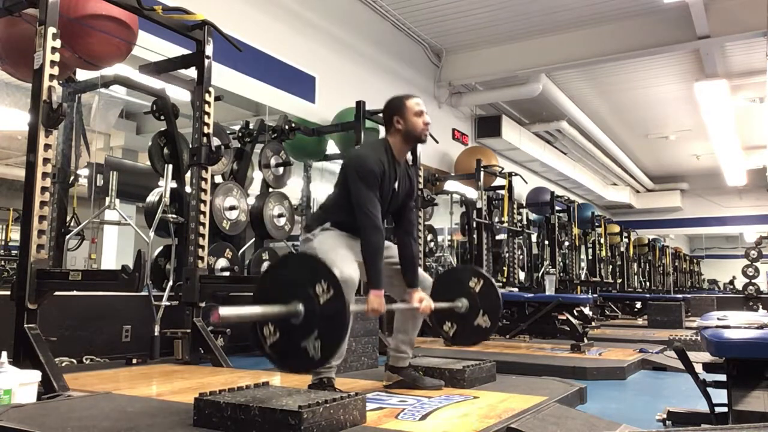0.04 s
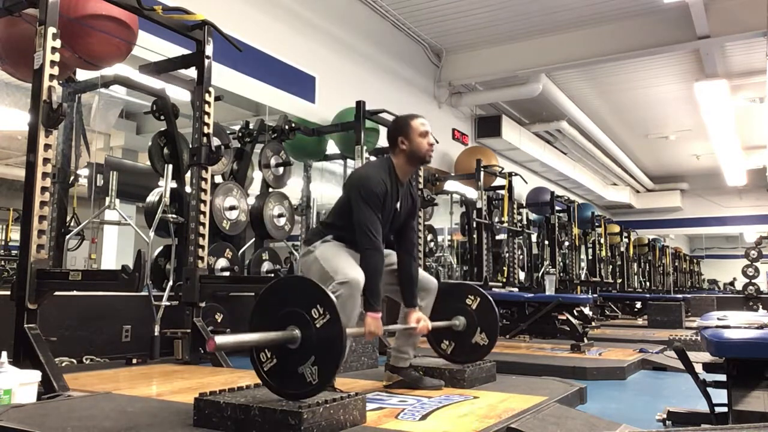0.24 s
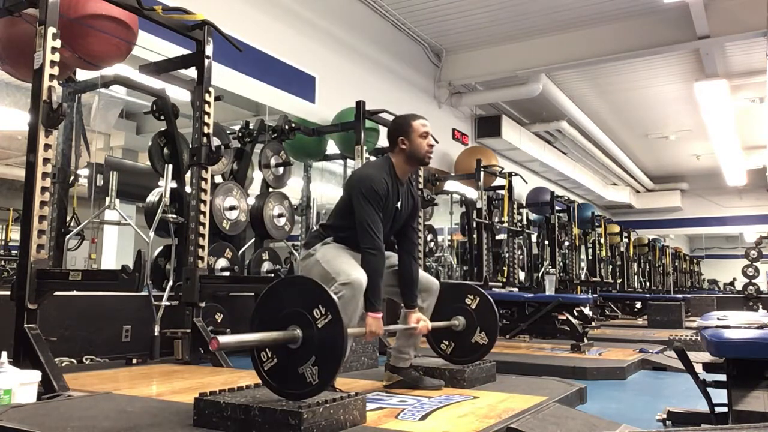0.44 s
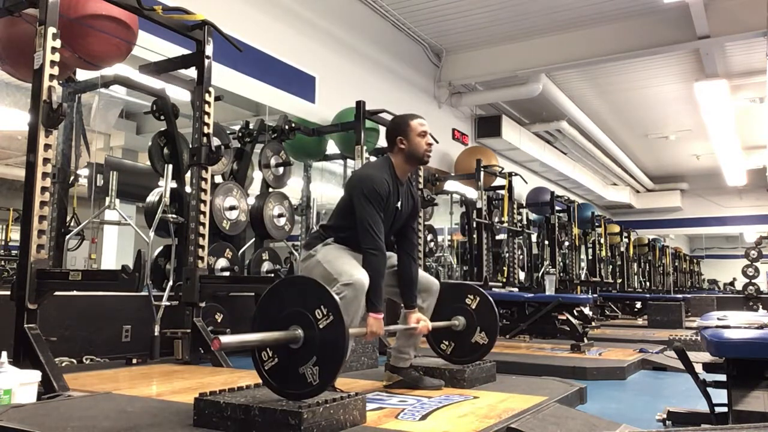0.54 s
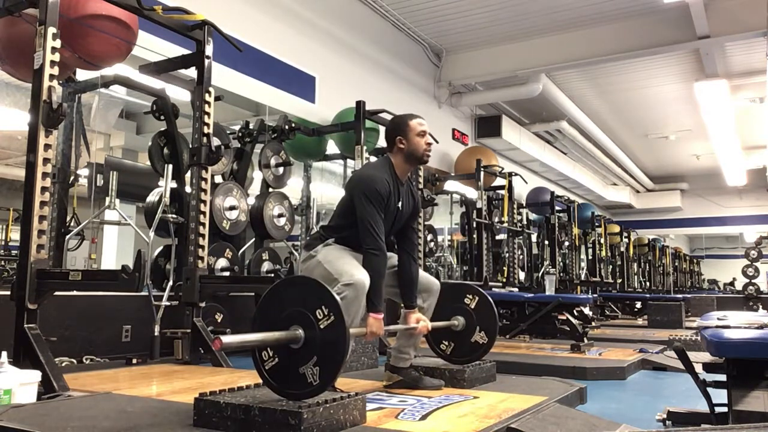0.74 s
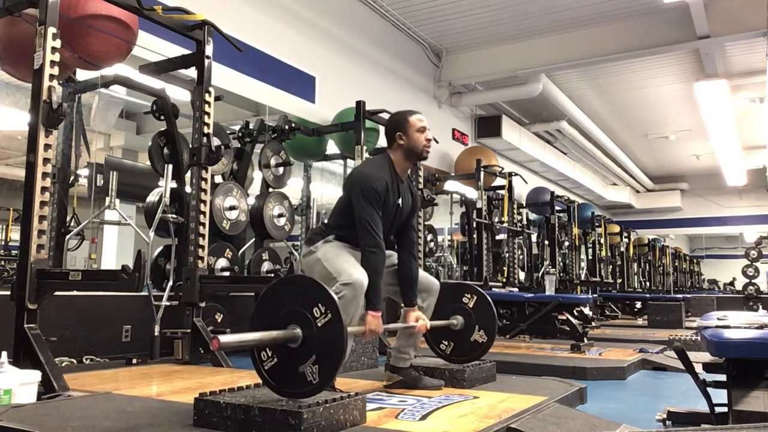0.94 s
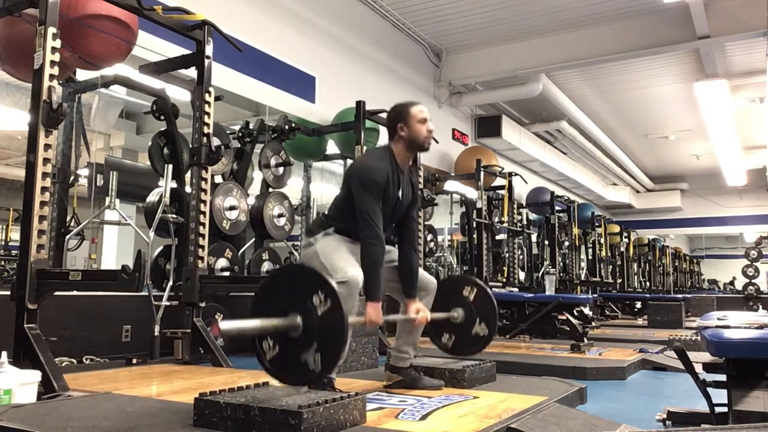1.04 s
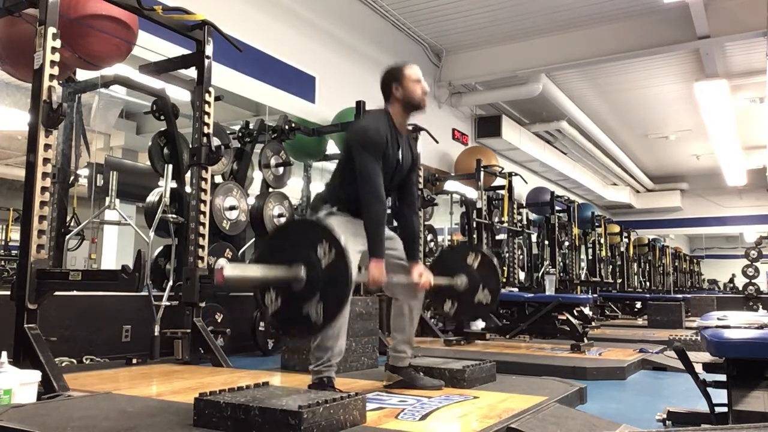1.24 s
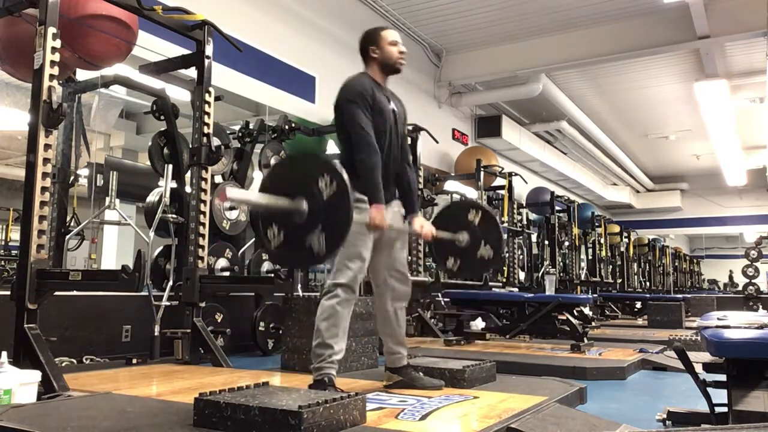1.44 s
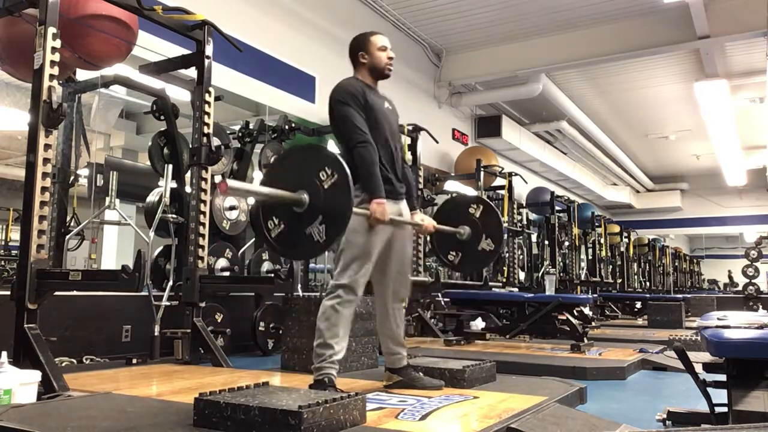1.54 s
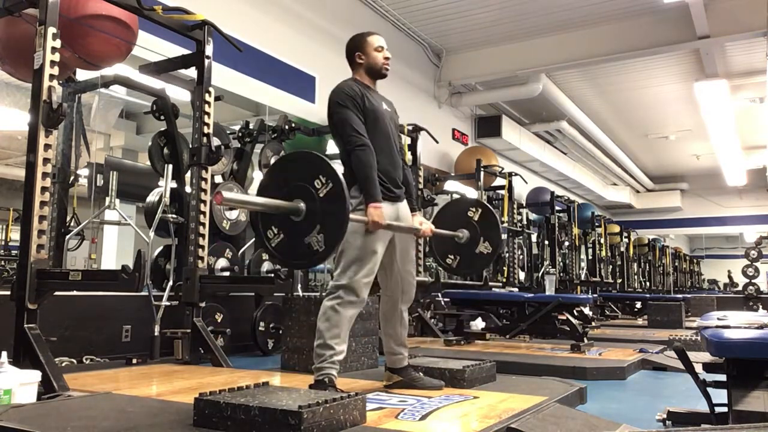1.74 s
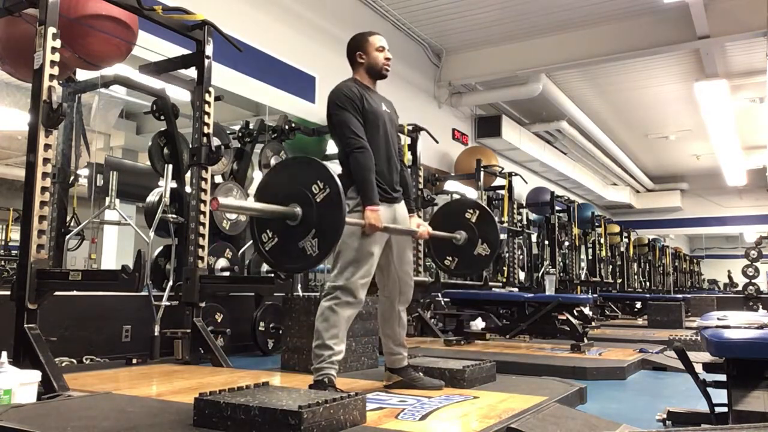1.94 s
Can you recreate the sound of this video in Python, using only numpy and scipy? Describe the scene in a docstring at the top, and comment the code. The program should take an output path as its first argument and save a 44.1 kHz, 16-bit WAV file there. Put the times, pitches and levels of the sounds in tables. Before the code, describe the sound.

In a big, reverberant gym, a barbell is set down with a heavy clang and metallic ringing. Quieter knocks follow as the bar is pulled up, then a few light rattles, over a low ventilation rumble.

```python
"""A large gym: a loaded barbell is set down on rubber blocks. The plates thud, clash on the
steel sleeves and slap together; the bar rings and flexes, and a collar jingles.
The plates knock as the bar is pulled taut, and the sleeves clink at the top of the next lift.
Blows are decaying noise, rings are modes and mode clusters. Ventilation rumbles under it all."""
import sys
import numpy as np
from scipy import signal
from scipy.fft import irfft
from scipy.io import wavfile

SR = 44100
rng = np.random.default_rng(int(sys.argv[2]) if len(sys.argv) > 2 else 0)


def file_out(sig):
    """Save sig as 16-bit WAV at sys.argv[1]."""
    # one column per channel
    cols = np.atleast_2d(sig).T
    # limit, then scale
    lim = np.clip(cols, -1, 1)
    pcm = np.round(lim * 32767).astype(np.int16)
    wavfile.write(sys.argv[1], SR, pcm)


N = 88200
T = np.arange(N) / SR

# Table levels are relative.
# plates landing on the blocks (time [s], level [dB])
THUD_HITS = [(0.2195, -3.5), (.230, -0.5), (0.251, 0), (0.267, -2.5), (.311, -1.5), (0.334, -0.5),
             (0.384, -4)]
# plates clashing on the bar (time [s], clash [dB], sleeve ring [dB])
CLASH_HITS = [(0.2255, 2, -7), (.233, 1.5, -14), (.239, 1, 1), (.249, 1.5, -7), (.2605, -3, -1),
              (.274, -2, -1.5), (0.282, -8.5, -9), (.289, -6, -5.5), (0.312, -12.5, 1),
              (0.3241, 0.5, -19.5), (0.3294, -5.5, -10), (.350, -20, -10), (0.4, -9, -21)]
# plate faces slapping (time [s], level [dB])
CLACK_HITS = [(.2405, -0.5), (0.25, -1.5), (0.2603, -3), (.325, 2), (0.3275, -2.5), (0.9199, -34),
              (1.501, -43)]
# bar bent on landing and lift-off (time [s], level [dB])
FLEX_HITS = [(.231, -1), (.905, -12)]
# plates shifting in the lift (time [s], knock [dB], sleeve ring [dB], tick [dB])
RATTLE_HITS = [(0.9063, -5, -35, 7.5), (.920, -3.5, -32, 8), (.928, -6.5, -38, -21), (.969, -9.5, -44, -22),
               (1.477, -22, -18.5, -7), (1.483, -8, -29, 1), (1.501, -3.5, -19.5, -2),
               (1.53, -26, -24, -5.5), (1.582, -8, -27, -8.5), (1.594, -10.5, -26.5, -6),
               (1.617, -15.5, -40, -20), (1.656, -11.5, -50.5, -13), (1.72, -13.5, -51, -24),
               (1.744, -21, -40, -27)]

# ringing modes of the loaded bar (frequency [Hz], level [dB])
RING_MODES = [(1281, -12), (1565, -10), (3023, -1), (3106, -6), (3588, -9), (3928, -4), (4005, -4),
              (4328, -2), (4407, -6), (4497, -4), (4730, -7), (5184, -10), (5416, 1), (6116, -8),
              (6576, -5), (6636, -9), (7584, -11), (8035, -3), (8644, -12), (10079, -11), (10854, -12),
              (13117, -14), (13353, -12), (13521, -9), (15349, -19)]
# bending modes of the bar (frequency [Hz], level [dB], t60 [s])
FLEX_MODES = [(96, -25, 1.4), (137, -29, 1.3), (176, -28, 1.4), (214, -30, 1.1), (295, -35, 1.5),
              (436, -38, 1.4), (483, -35, 1.3), (1180, -42, 1.9)]
# sleeve modes (frequency [Hz], width [Hz], landing [dB], light touch [dB], free t60 [s])
SLEEVE_CLUSTERS = [(3075, 96, 3, -8.5, 0.78), (5450, 110, 3.5, -3, 0.34), (8060, 100, 0.5, -7.5, 0.44),
                   (10050, 100, -5, -5, 0.42), (10590, 205, -18, -14, 0.55), (13400, 450, -11.5, -26, .55)]
# collar and plate hub modes (frequency [Hz], width [Hz], level [dB], t60 [s])
COLLAR_CLUSTERS = [(13530, 75, -41, .3), (15350, 90, -56, .4), (14400, 600, -55, .35)]
HUB_CLUSTERS = [(1515, 88, -63, 0.59), (2050, 114, -43.5, 0.83), (2900, 700, -38.5, 0.15),
                (8020, 87, -61, 0.31), (13000, 260, -62, .32)]

# spectra of the blows and the vent air (frequency [Hz], density [dB])
THUD_SPECTRUM = [(25, -65.5), (55, -36), (78, -13.5), (100, -2), (170, 0), (260, -9), (480, -12),
                 (800, -32.5), (1500, -29), (4000, -51.5)]
CLASH_SPECTRUM = [(200, -17), (700, 1.5), (1400, -7), (2100, 2), (2900, 0.5), (3550, -3), (4300, -2),
                  (5300, -6), (6000, -10), (8000, -11), (9200, -15), (10500, -9.5), (11800, -23.5),
                  (13500, -13.5), (15700, -20.5)]
CLACK_SPECTRUM = [(1500, -30), (3000, -30.5), (4000, 14.5), (5600, -1), (6600, -4.5), (8500, -19.5),
                  (11000, -30.5), (16000, -45)]
KNOCK_SPECTRUM = [(150, 0), (500, 4), (900, 1), (1500, 1.5), (2200, -0.5), (3100, -1.5), (4200, -19),
                  (6000, -22), (15000, -43)]
TICK_SPECTRUM = [(1000, 1), (4000, 13), (6500, 0), (9500, 1.5), (11700, -23), (12900, -4), (14000, -12),
                 (16000, -14)]
AIR_SPECTRUM = [(12, -69.5), (20, -54), (52, -6.5), (107, -3), (141, -9.5), (177, -6.5), (209, -13.5),
                (355, -15.5), (397, -22), (587, -22.5), (798, -29.5), (1210, -34), (1400, -42),
                (1850, -37.5), (4510, -52.5), (12000, -61), (15800, -67.5)]
# fan tones (frequency [Hz], width [Hz], level [dB])
FAN_TONES = [(101.8, 12, -42.5), (606, 18, -53), (1230, 10, -64)]
# hall decay (frequency [Hz], t60 [s])
HALL_DECAY = [(80, 1.8), (250, 2.44), (600, 1.7), (1200, 1.92), (2400, 1.344), (4000, 0.91), (7000, 0.68),
              (14000, 0.3)]

THUD_DB, CLASH_DB, CLACK_DB, BAR_DB, SLEEVE_DB = -13.5, -17.5, -12, -31, -30
KNOCK_DB, TICK_DB, AIR_DB = -31.5, -51.5, -35
SETTLE_S, PULL_S = 0.388, 0.918


def thuds():
    """Rubber plates hit the blocks and bounce."""
    out = np.zeros(N)
    for time_s, db in THUD_HITS:
        add(out, time_s, amp(THUD_DB + db) * burst(THUD_SPECTRUM, t60_s=0.13, attack_s=0.001))
    return out


def clashes():
    """Plate hubs slam against the sleeves and one another."""
    out = np.zeros(N)
    for time_s, db, _ in CLASH_HITS:
        add(out, time_s, amp(CLASH_DB + db) * burst(CLASH_SPECTRUM, t60_s=0.13, attack_s=0.00095))
    return out


def clacks():
    """Plate faces slap together, short and hard."""
    out = np.zeros(N)
    for time_s, db in CLACK_HITS:
        add(out, time_s, amp(CLACK_DB + db) * burst(CLACK_SPECTRUM, t60_s=0.028, attack_s=0.0005))
    return out


def bar_ring():
    """Each clash feeds the bar's modes; close neighbours make them beat."""
    out = np.zeros(N)
    strikes = [(time_s, db) for time_s, db, _ in CLASH_HITS]
    for hz, db in RING_MODES:
        envelope = build_up(strikes, t60_s=0.56 * (4000 / hz) ** 0.33)  # higher modes die sooner
        beating = mode(hz) + amp(-1) * cluster(hz, width_hz=30)
        out += amp(db) * envelope / envelope.max() * beating
    return amp(BAR_DB) * out


def bar_flex():
    """The bar bends and swings under its load."""
    out = np.zeros(N)
    for time_s, flex_db in FLEX_HITS:
        swing = sum(amp(db) * mode(hz, t60_s) for hz, db, t60_s in FLEX_MODES)
        add(out, time_s, amp(flex_db) * rise(attack_s=0.003) * swing)
    return out


def sleeves():
    """Clashes ring the sleeves; rattles make them clink."""
    out = np.zeros(N)
    landings = [(time_s, db) for time_s, _, db in CLASH_HITS]
    touches = [(time_s, db) for time_s, _, db, _ in RATTLE_HITS]
    for hz, width_hz, landing_db, touch_db, t60_s in SLEEVE_CLUSTERS:
        ring = amp(landing_db) * build_up(landings, t60_s)
        clink = amp(touch_db) * build_up(touches, 0.75 * t60_s)  # damped by a resting plate
        out += cluster(hz, width_hz) * (ring + clink)
    return amp(SLEEVE_DB) * out


def fittings():
    """A collar jingles as the load settles; the hubs ring as the bar is pulled taut."""
    out = np.zeros(N)
    for time_s, clusters in (SETTLE_S, COLLAR_CLUSTERS), (PULL_S, HUB_CLUSTERS):
        for hz, width_hz, db, t60_s in clusters:
            add(out, time_s, amp(db) * cluster(hz, width_hz, t60_s))
    return out


def rattles():
    """Loose plates knock and tick during the lift."""
    out = np.zeros(N)
    for time_s, knock_db, _, tick_db in RATTLE_HITS:
        knock = amp(KNOCK_DB + knock_db) * burst(KNOCK_SPECTRUM, t60_s=0.088, attack_s=0.00093)
        tick = amp(TICK_DB + tick_db) * burst(TICK_SPECTRUM, t60_s=0.056, attack_s=0.00032)
        add(out, time_s, knock + tick)
    return out


def hall(x, wet_db):
    """Direct sound plus dense reflections, each band dying at its own rate."""
    hz, time_s, bands = signal.stft(rng.standard_normal(N), SR, nperseg=256)
    decay_per_s = np.log(1000) / read(HALL_DECAY, hz)[:, None]
    unit_energy = np.sqrt(2 * decay_per_s / SR)
    tail = signal.istft(bands * np.exp(-decay_per_s * time_s) * unit_energy, SR, nperseg=256)[1][:N]
    onset = np.minimum(T / 0.012, 1)
    return x + amp(wet_db) * signal.fftconvolve(x, tail * onset)[:N]


def ventilation():
    """Steady air rumble with faint fan tones."""
    air = amp(AIR_DB) * noise(AIR_SPECTRUM)
    return air + sum(amp(db) * cluster(hz, width_hz) for hz, width_hz, db in FAN_TONES)


def burst(spectrum, t60_s, attack_s):
    """Many heavily damped modes struck at once."""
    return noise(spectrum) * fade(t60_s) * rise(attack_s)


def mode(hz, t60_s=np.inf):
    """One partial, random phase; sustained by default."""
    onset = np.minimum(T / 0.0005, 1)
    return np.sqrt(2) * np.sin(2 * np.pi * (hz * T + rng.random())) * fade(t60_s) * onset


def cluster(hz, width_hz, t60_s=np.inf):
    """Close modes beating around one frequency; sustained by default."""
    offset_hz = np.fft.rfftfreq(N, 1 / SR) - hz
    peak = (1 + (2 * offset_hz / width_hz) ** 2) ** -0.75
    return random_phase(peak) * fade(t60_s)


def build_up(strikes, t60_s):
    """Envelope of a ring fed by strikes (time [s], level [dB]); energies add and decay."""
    power = np.zeros(N)
    strike_power = fade(t60_s) ** 2 * rise(attack_s=0.001)
    for time_s, db in strikes:
        add(power, time_s, amp(db) ** 2 * strike_power)
    return np.sqrt(power)


def noise(spectrum):
    """Steady noise from a spectrum table, rms 1."""
    return random_phase(amp(read(spectrum, np.fft.rfftfreq(N, 1 / SR))))


def random_phase(magnitudes):
    """Noise from FFT magnitudes, rms 1."""
    x = irfft(magnitudes * np.exp(2j * np.pi * rng.random(len(magnitudes))), N)
    return x / np.sqrt(np.mean(x ** 2) + 1e-20)


def rise(attack_s):
    """Exponential attack."""
    return 1 - np.exp(-T / attack_s)


def fade(t60_s):
    """Exponential decay."""
    return np.exp(-np.log(1000) * T / t60_s)


def amp(db):
    """Decibels to gain."""
    return 10 ** (np.asarray(db) / 20)


def read(table, hz):
    """Table lookup on a log-frequency axis."""
    table_hz, values = np.transpose(table)
    return np.interp(np.log(hz + 1), np.log(table_hz + 1), values)


def add(mix, time_s, sound):
    """Mixes a sound in at time_s."""
    part = mix[round(time_s * SR):][:len(sound)]
    part += sound[:len(part)]


def scene():
    """Barbell, hall and ventilation, mono."""
    steel = bar_ring() + bar_flex() + hall(sleeves() + fittings(), wet_db=-7.5)
    blows = hall(thuds(), wet_db=3) + hall(clashes(), wet_db=-0.5) + hall(clacks(), wet_db=-10)
    return (steel + blows + hall(rattles(), wet_db=-0.5) + ventilation())[None]


def record(dry):
    """Microphone low cut, soft overload on the highest peaks, band limit."""
    low_cut_hz, high_cut_hz, ceiling = 61, 15850, 0.95
    thinned = signal.sosfilt(signal.butter(4, low_cut_hz, "high", fs=SR, output="sos"), dry)
    limited = thinned / (1 + (thinned / ceiling) ** 4) ** 0.25
    lowpass = signal.firwin(511, high_cut_hz, window=("kaiser", 9), fs=SR)
    return signal.oaconvolve(limited, lowpass[None], "same")


dry = scene()
out = record(dry)
file_out(out)
```